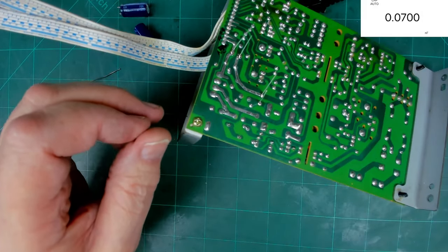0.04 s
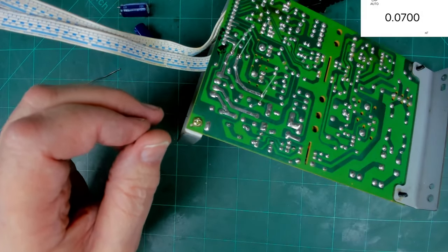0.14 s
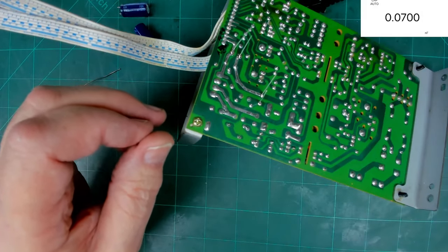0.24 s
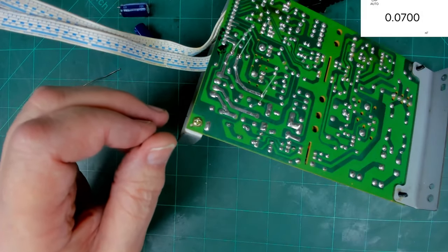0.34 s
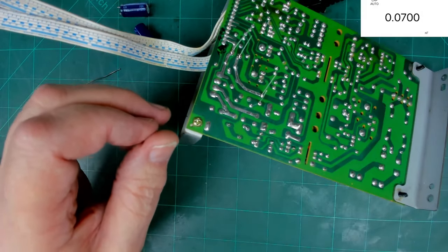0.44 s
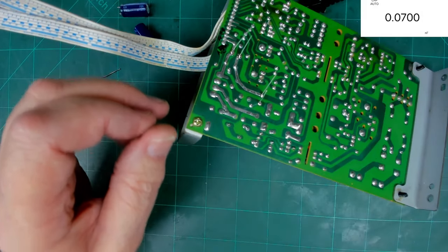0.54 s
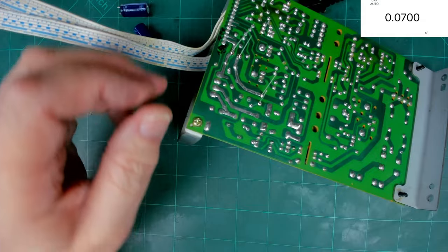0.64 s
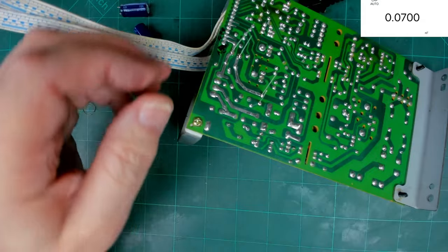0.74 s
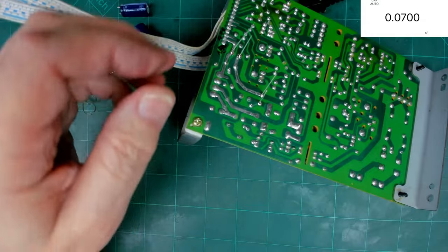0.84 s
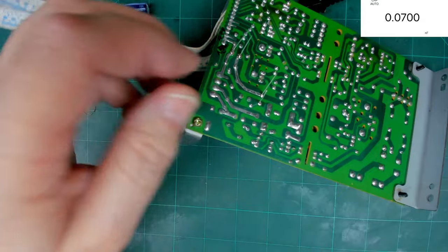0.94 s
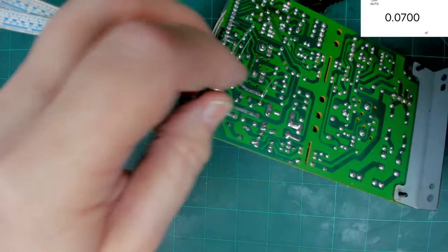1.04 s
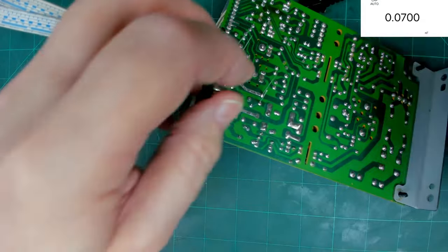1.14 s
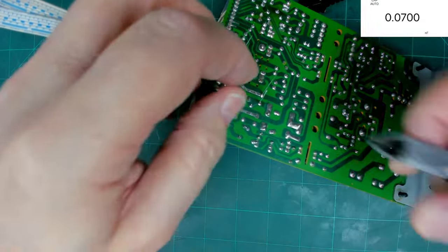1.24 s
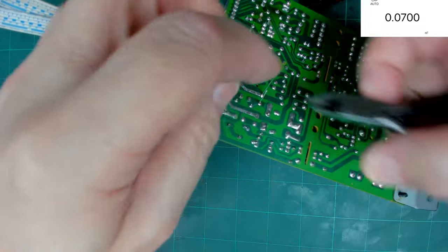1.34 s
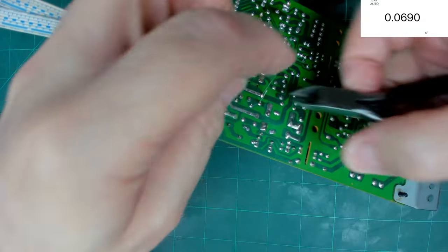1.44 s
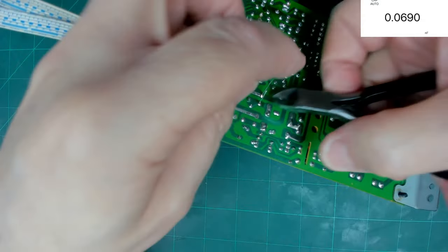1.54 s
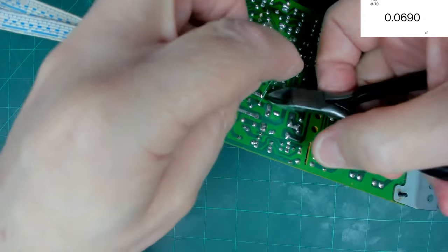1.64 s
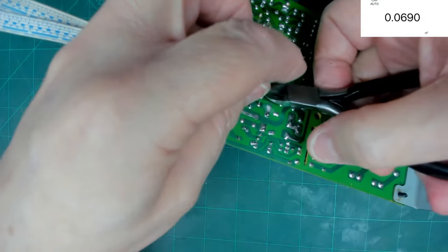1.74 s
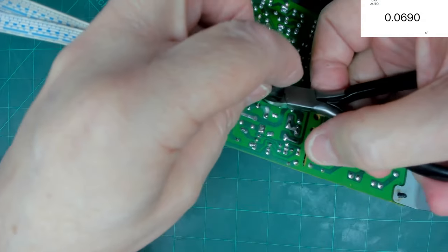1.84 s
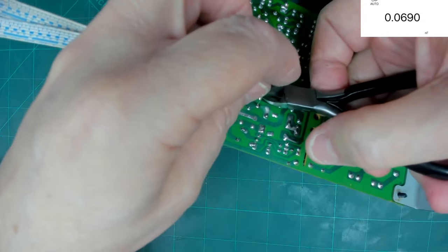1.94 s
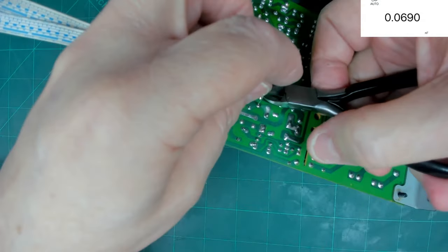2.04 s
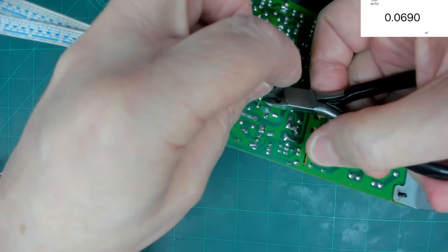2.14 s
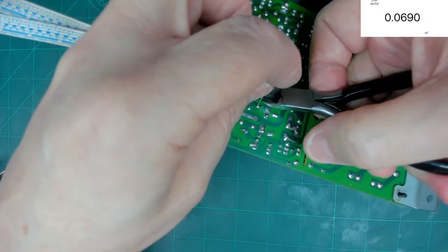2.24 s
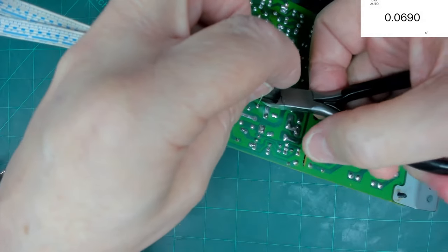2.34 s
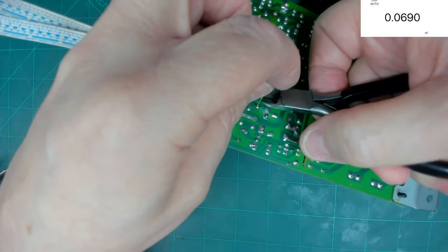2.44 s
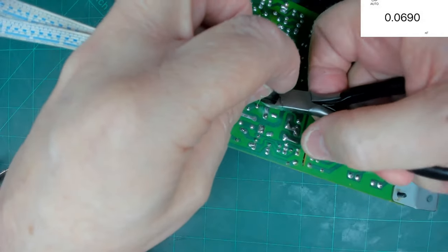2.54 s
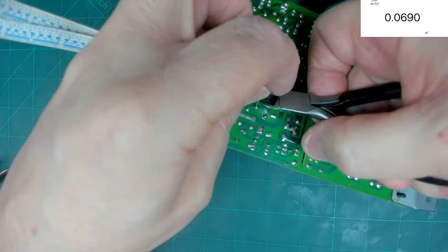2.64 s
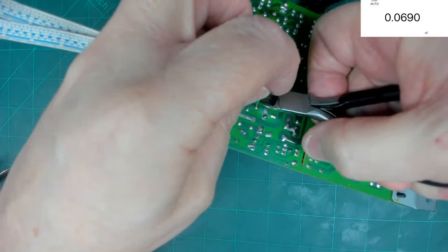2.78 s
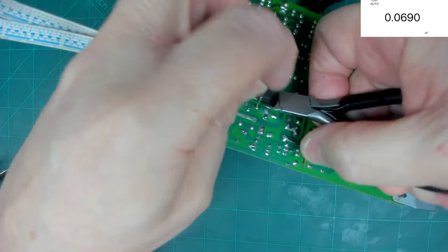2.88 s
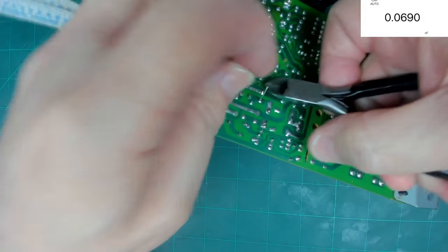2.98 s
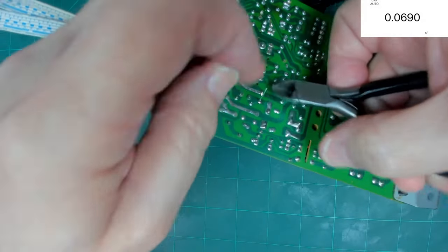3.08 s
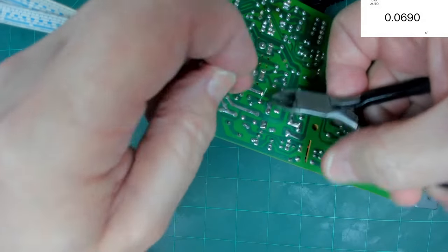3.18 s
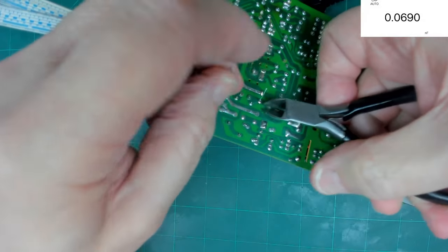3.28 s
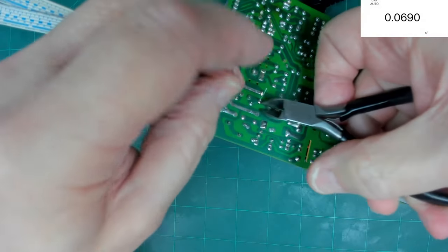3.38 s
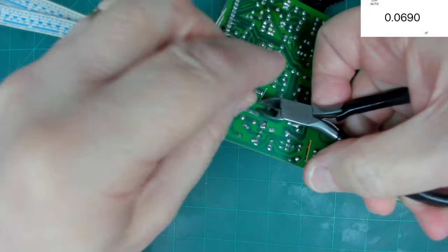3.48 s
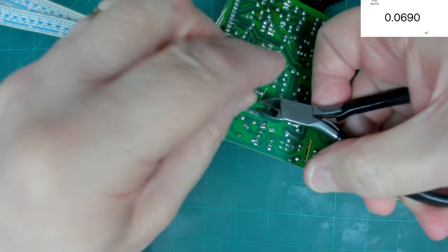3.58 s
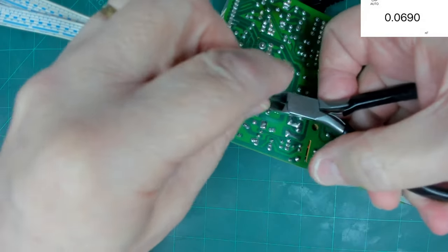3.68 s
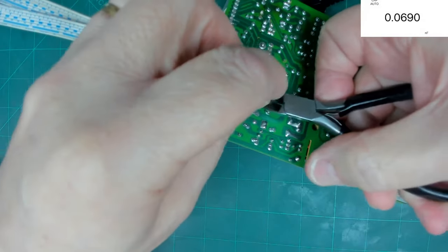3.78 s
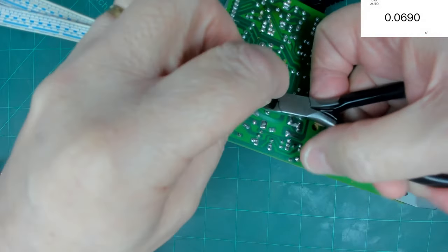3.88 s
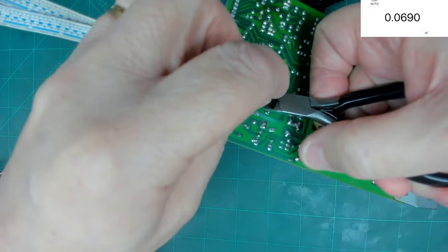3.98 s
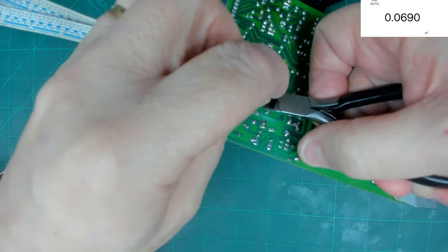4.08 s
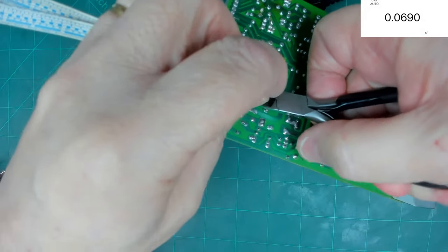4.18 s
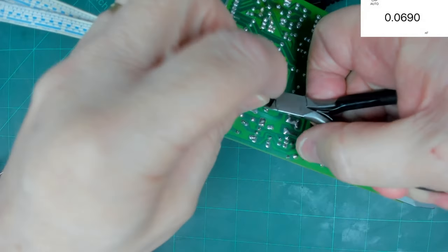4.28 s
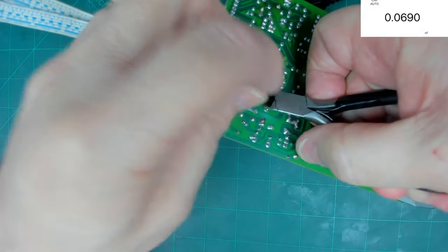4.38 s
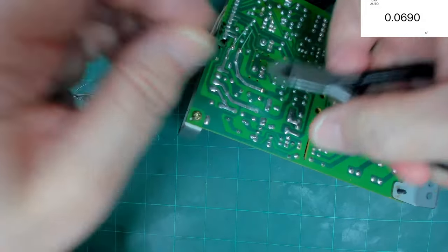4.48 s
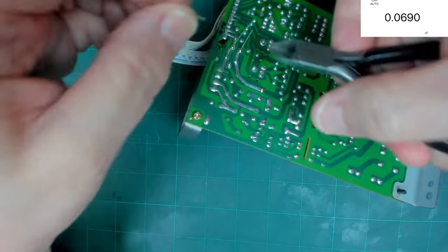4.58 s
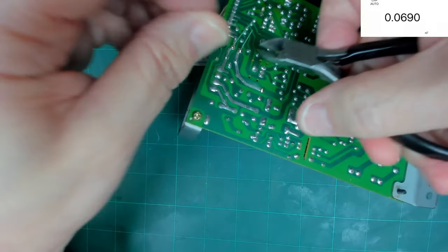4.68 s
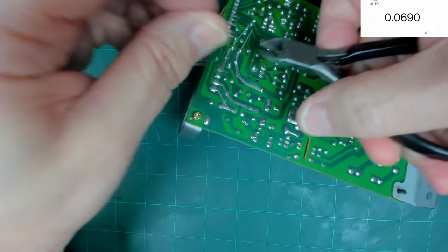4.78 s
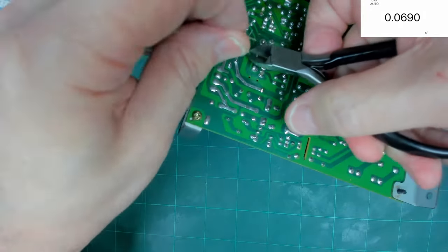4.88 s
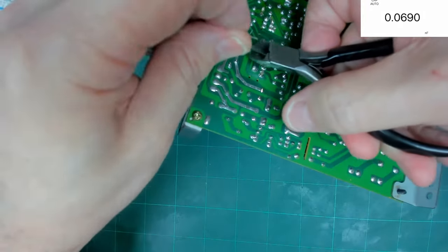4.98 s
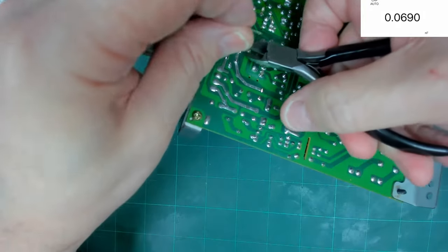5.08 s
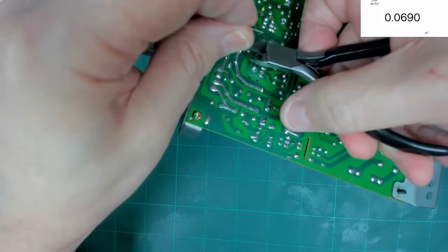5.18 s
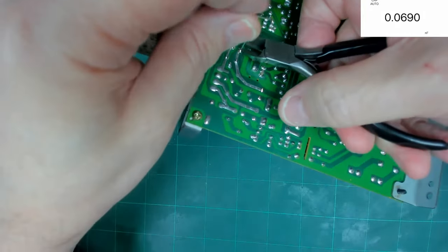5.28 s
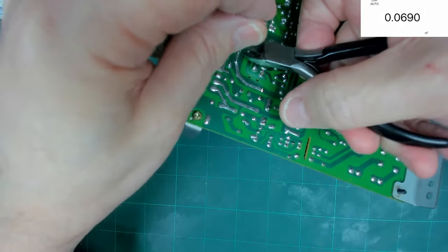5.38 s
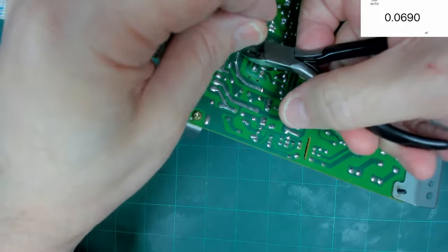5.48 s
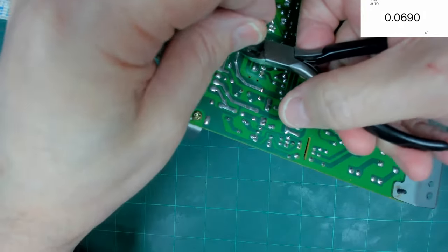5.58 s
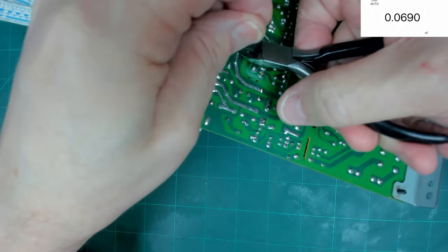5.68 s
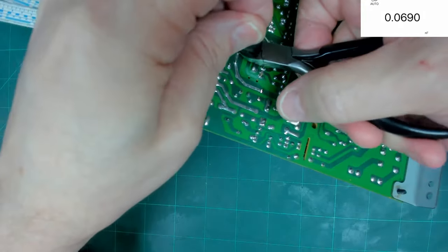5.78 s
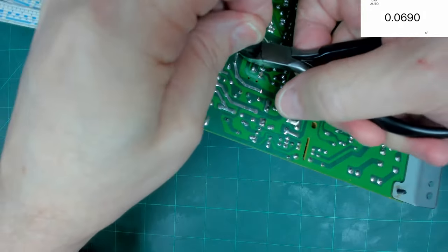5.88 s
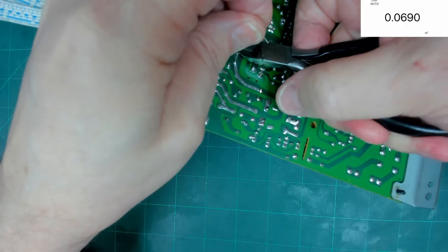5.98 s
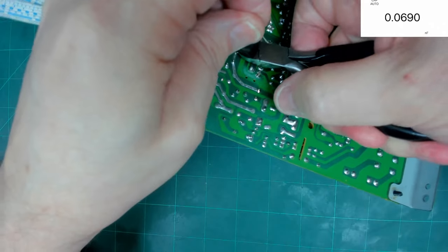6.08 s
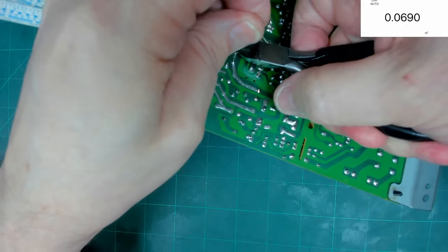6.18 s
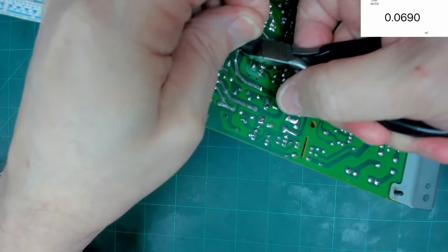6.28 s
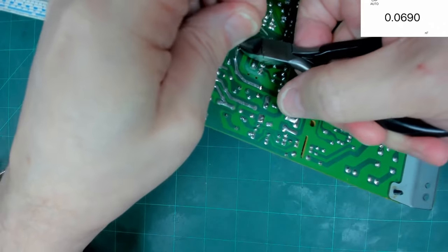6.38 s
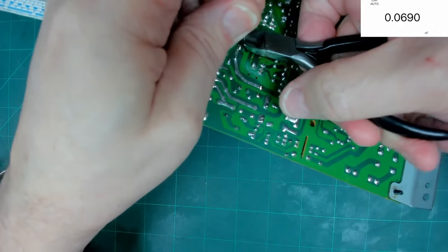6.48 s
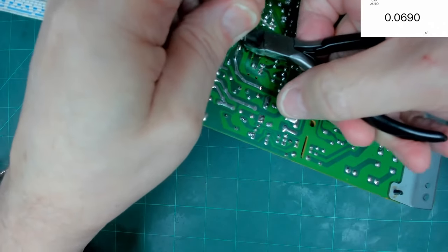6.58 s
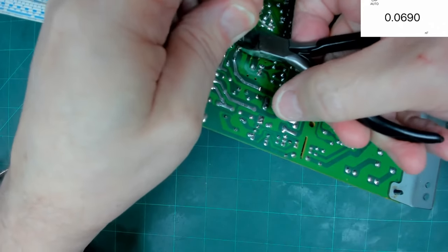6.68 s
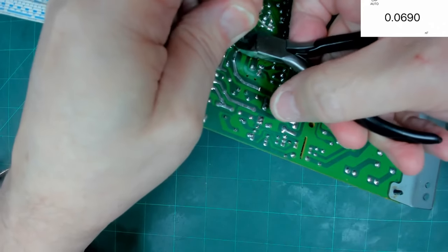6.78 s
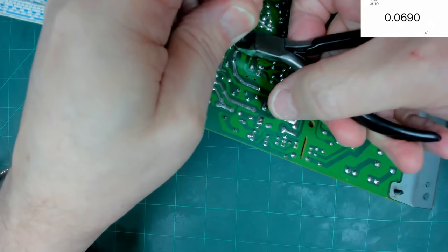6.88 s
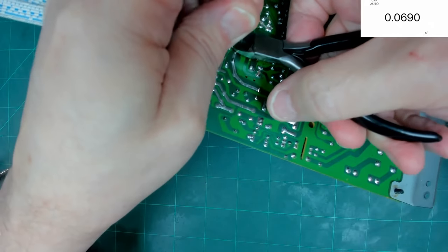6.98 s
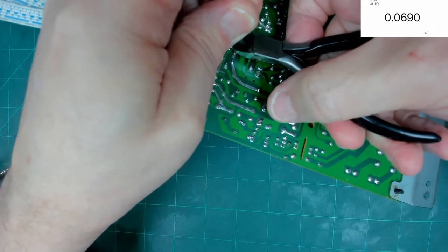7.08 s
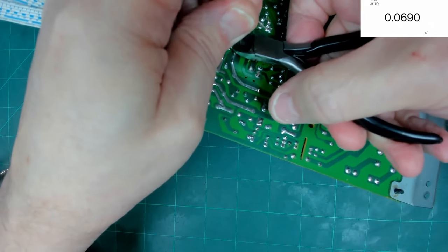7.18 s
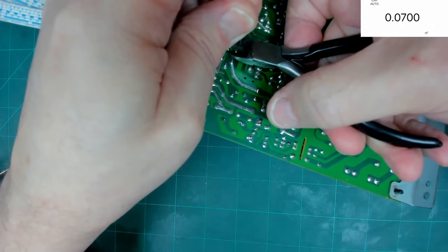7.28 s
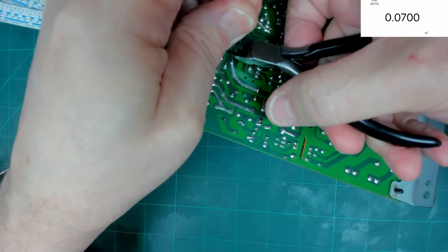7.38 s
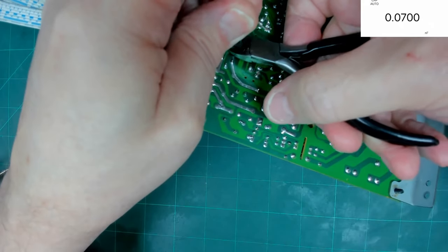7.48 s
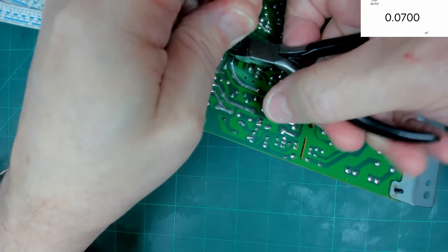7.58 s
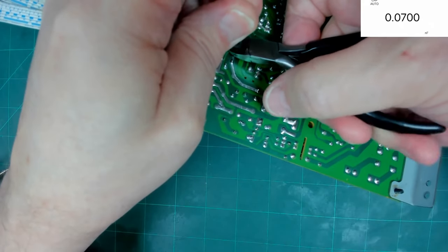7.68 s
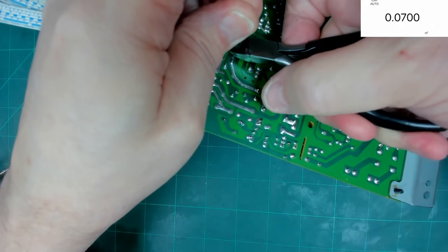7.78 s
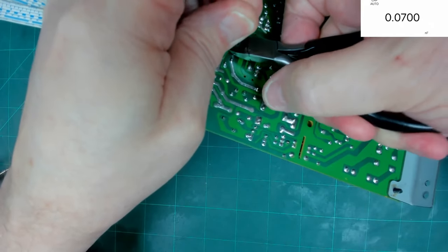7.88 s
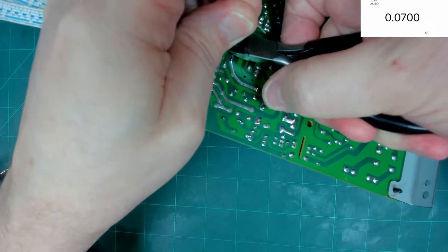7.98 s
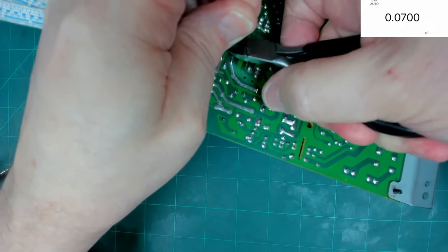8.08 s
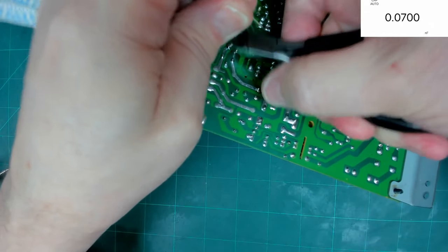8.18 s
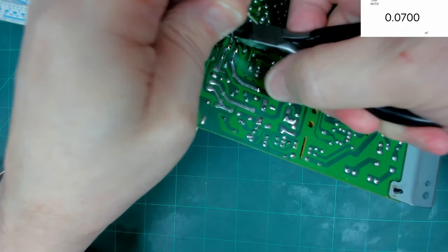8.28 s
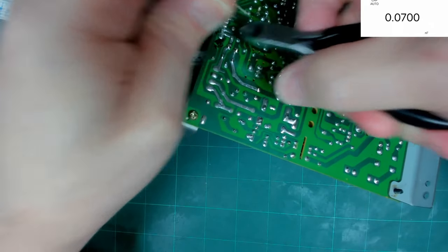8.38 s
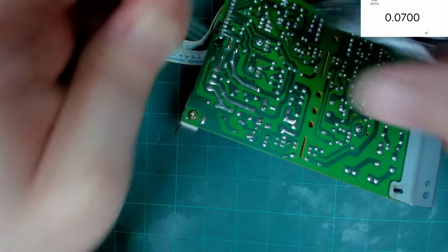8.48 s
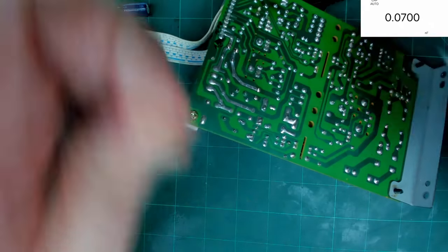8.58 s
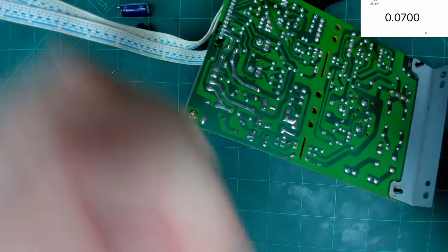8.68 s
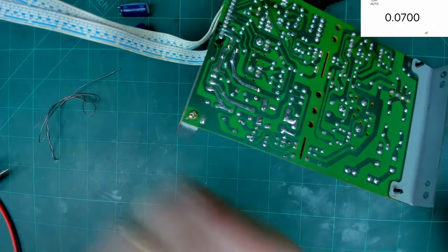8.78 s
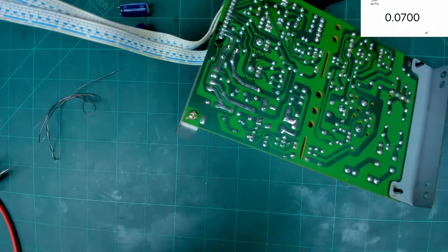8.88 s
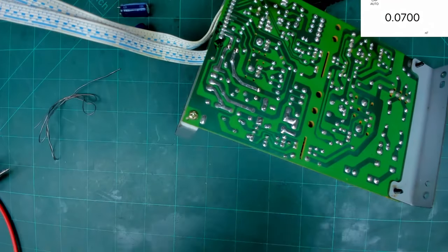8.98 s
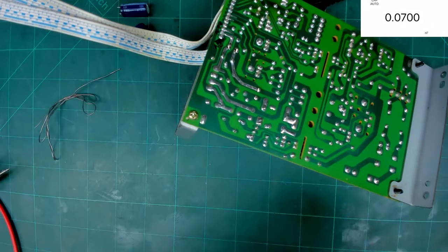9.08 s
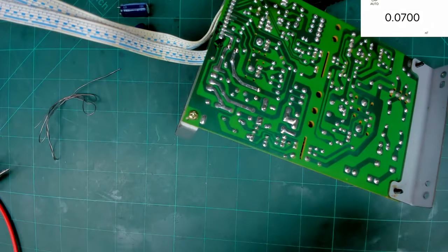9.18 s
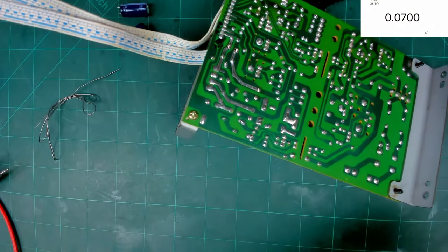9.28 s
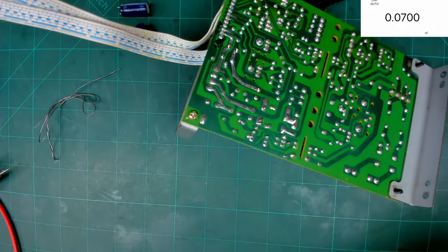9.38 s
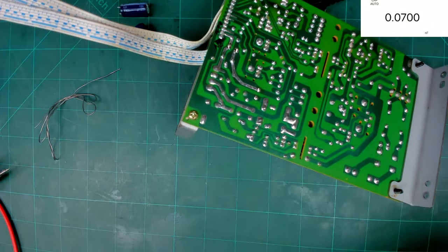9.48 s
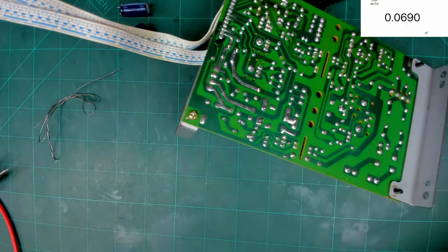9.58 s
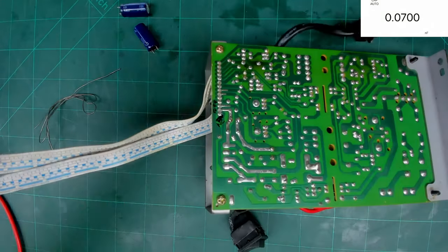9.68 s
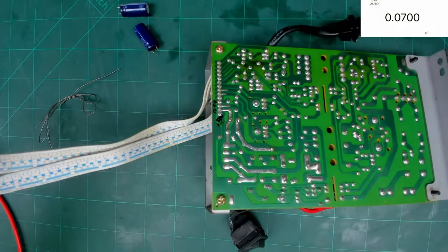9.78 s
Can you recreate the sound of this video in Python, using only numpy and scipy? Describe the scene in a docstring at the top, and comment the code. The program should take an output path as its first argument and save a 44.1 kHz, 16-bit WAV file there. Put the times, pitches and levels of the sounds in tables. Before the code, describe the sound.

A small workshop bench is heard close in mono, with a faint, low, slightly unsteady fan hum and soft air hiss throughout. At about 0.1 to 0.2 seconds a soldering iron clatters into its metal stand: a tight cluster of dull knocks, short ringing and bright scraping. The hum is left alone until very faint ticks at 1.8 and 2.3. Side cutters snip leads at about 2.7, 4.2, 6.1 and 8.1 seconds, each an abrupt crack with a low thump, a small high ping, briefly ringing jaws and a short room bloom. Tiny ticks fall between, near 3.9, 5.8, 7.7 and 8.7. From 9.0 light contacts lead to the cutters dropping hard on the bench at 9.2, the loudest knock, bouncing at once with a short rub. Around 9.65 the board slides on its mat with a low shuddering scuff, and one last faint tick follows.

```python
"""A small workshop bench in mono, close to the microphone, with an equipment fan humming underneath throughout.
First a soldering iron clatters into its stand: struck modes, dull knocks and bursts of scraping noise.
Faint ticks follow as side cutters find the leads on a circuit board; four leads part, each with a thump,
a crack, a short ping and ringing jaws. At the end the cutters drop on the bench, a knock with ringing modes,
and the board is slid round on its mat, heard as unsteady coloured noise."""
import sys
import numpy as np
from scipy import signal
from scipy.fft import rfft, irfft, next_fast_len
from scipy.io import wavfile
from scipy.ndimage import map_coordinates

SR = 44100
rng = np.random.default_rng(int(sys.argv[2]) if len(sys.argv) > 2 else 0)


def to_wav(sig):
    """Store sig (one row per channel, or 1-D mono) as 16-bit WAV at the path in sys.argv[1].

    Samples outside -1..1 are clipped; the rate is SR.
    """
    pcm = np.clip(np.atleast_2d(sig), -1, 1) * 32767
    pcm = np.round(pcm).astype(np.int16)
    wavfile.write(sys.argv[1], SR, pcm.T)  # frames by channels


N = 433944
RING = np.arange(SR // 2) / SR  # the half second after a blow (s)


def amp(db):
    """Decibels to gain."""
    return 10 ** (np.asarray(db) / 20)


def unit(x):
    """Scale to rms 1."""
    return x / np.sqrt(np.mean(x ** 2) + 1e-20)


def along(points, hz):
    """Read (Hz, value) points on a log frequency axis."""
    f, v = np.transpose(points)
    return np.interp(np.log(hz + 1), np.log(f + 1), v)


def wobble(rate):
    """A smooth random curve, rate knots a second."""
    knots = rng.standard_normal(int(N * rate / SR) + 4)
    return map_coordinates(knots, [np.arange(N) * rate / SR])


def filtered(x, response):
    """Multiply the spectrum of x by a response of frequency."""
    m = next_fast_len(len(x) + 8192)  # padded so that the end does not wrap onto the start
    hz = np.fft.rfftfreq(m, 1 / SR)
    return irfft(rfft(x, m) * response(hz), m)[:len(x)]


def noise(spectrum):
    """Steady noise of rms 1 with a given colour."""
    return unit(filtered(rng.standard_normal(N), lambda hz: amp(along(spectrum, hz))))


def resonant(modes, order):
    """The (Hz, dB) spectrum of (Hz, width, dB) resonances; a higher order gives steeper skirts."""
    hz = np.geomspace(10, SR / 2, 2000)
    power = 0
    for centre, width, db in modes:
        response = np.abs(hz * width / (centre * centre - hz * hz + 1j * hz * width))
        power = power + (amp(db) * response ** order) ** 2
    return np.column_stack([hz, 10 * np.log10(power)])


def impulse(spectrum, size=2048):
    """The shortest causal (minimum-phase) pulse with a given colour, peak 1."""
    cepstrum = irfft(np.log(amp(along(spectrum, np.fft.rfftfreq(size, 1 / SR)))))
    cepstrum[1:size // 2] *= 2  # fold the second half onto the first
    cepstrum[size // 2 + 1:] = 0
    pulse = irfft(np.exp(rfft(cepstrum)))
    return pulse / np.abs(pulse).max()


def tail(spectrum, length):
    """Diffuse ringing from about rms 1; each band dies in the room's time, times length."""
    # How the room dies away. Each row: frequency in Hz, t60 in s at length 1.
    room = [(100, 0.55), (400, 0.38), (1500, 0.26), (4000, 0.21), (6500, 0.2), (10000, 0.17), (16000, 0.14)]
    hz, t, bands = signal.stft(rng.standard_normal(len(RING)), SR, nperseg=256)
    t60 = length * along(room, hz)[:, None]
    fading = signal.istft(bands * amp(-60 * t / t60), SR, nperseg=256)[1]
    colour = impulse(spectrum)
    return signal.fftconvolve(fading, colour / np.linalg.norm(colour))[:len(RING)]


def add(track, s, sound):
    """Mix a sound into the track at s seconds."""
    part = track[max(round(s * SR), 0):][:len(sound)]
    part += sound[:len(part)]


def ringing(modes):
    """A struck body's modes decay as sines, at slightly new strengths for each blow."""
    hz, db, t60 = np.transpose(modes)[:, :, None]
    strength = amp(db + 2.1 * rng.standard_normal(hz.shape) - 60 * RING / t60)
    sign = (-1) ** np.arange(len(modes))[:, None]
    onset = 1 - np.exp(-RING / 0.0013)
    return np.sum(sign * strength * np.sin(2 * np.pi * hz * RING), axis=0) * onset


def contact(modes, knock_db, ring_db, clack_db, pitch=1):
    """A dull knock with its room echo, the ring of the struck body and the clack of the tool's metal."""
    # Colour of the dull knock. Each row: frequency in Hz at pitch 1, relative level in dB per Hz.
    knock_colour = [(30, -43), (120, -6.5), (300, -11.5), (550, 4), (800, 1), (1050, -5), (1400, -25.5),
                    (2500, -42.5), (5000, -31.5), (16000, -44)]
    # Colour of the metal clack. Each row: frequency in Hz, relative level in dB per Hz.
    clack_colour = [(200, 8), (800, 8), (1600, 7.5), (2600, -5), (3600, -3), (5000, -17), (8000, -24.5),
                    (12000, -28), (16000, -27)]
    colour = np.array(knock_colour) * [pitch, 1]
    sound = amp(knock_db - 19.5) * tail(colour, length=0.44)
    sound += amp(ring_db - 9) * ringing(modes)
    sharp_start = 1 + 2.47 * amp(-60 * RING / 0.017)
    sound += amp(clack_db - 0.5) * tail(clack_colour, length=0.86) * sharp_start
    soft = signal.butter(2, 4500, fs=SR, output="sos")  # the blow takes a moment to build
    add(sound, 0, amp(knock_db) * signal.sosfilt(soft, impulse(colour)))
    return sound


def fan():
    """Air drones in the housing's resonances, under slightly unsteady tones and a soft hiss."""
    # Resonances of the fan's housing. Each row: centre in Hz, width in Hz at order 1, relative level in dB.
    housing = [(37.6, 5, -1.5), (270, 16, -9), (318, 44, -4.5), (362.5, 12.7, 1.5), (747.6, 31, -14.5),
               (1387, 50, -24)]
    # Colour of the low rumble. Each row: frequency in Hz, relative level in dB per Hz.
    rumble = [(15, -9), (60, 0.5), (140, -4.5), (190, 3.5), (330, 3.5), (450, -0.5), (570, -3.5), (800, 0),
              (1000, -18.5), (1500, -39.5)]
    # Colour of the hiss of air. Each row: frequency in Hz, relative level in dB per Hz.
    air = [(530, -31.5), (900, -7), (979, -2), (1040, -4), (1230, -6.5), (1420, -0.5), (1540, -2),
           (1940, -2), (2430, -5.5), (2620, -9.5), (3890, -12.5), (4600, -21), (15800, -35)]
    # Fan and mains tones. Each row: frequency in Hz, typical level in dB rms.
    tone_rows = [(120, -80), (361, -72.5), (686.6, -73), (1961.4, -88), (2353.7, -91.5), (2746, -94.5)]
    # Slow course of the drone, followed in part. Each row: time in seconds, relative level in dB.
    drone_level = [(0.4, -58), (1.32, -64.5), (2.67, -60), (3.76, -66), (4.26, -62), (5.11, -64.5),
                   (5.77, -60.5), (8.54, -61.5), (8.9, -62.5)]
    mean_gain_db, swing_share = -.5, 0.57  # the share of the course's swing that the drone follows

    t = np.arange(N) / SR
    drone = amp(-59.5) * noise(resonant(housing, order=2)) + amp(-66.0) * noise(rumble)
    level_db = np.interp(t, *np.transpose(drone_level))
    drone *= amp(mean_gain_db + swing_share * (level_db - level_db.mean()))
    tones = np.zeros(N)
    for hz, db in tone_rows:
        level = amp(db + 0.82 * wobble(3.0)) * np.sqrt(2)  # rms to peak
        tones += level * np.sin(2 * np.pi * hz * t + 0.98 * wobble(3.4))
    hiss = amp(-75.5 + 0.25 * wobble(2.7)) * noise(air)
    return drone + tones + hiss


def iron():
    """The iron bounces into its stand: square blows ring the stand, glancing ones scrape metal on metal."""
    # The iron's blows. Each row: start in seconds, strength in dB, slant from 0 (square) to 1 (glancing).
    clatter = [(.094, -51, 0.13), (0.1377, -23.5, 0.53), (0.1426, -25.5, 0.014), (.1547, -26, 0.64),
               (.162, -25, 0.83), (.172, -32.5, 0.62), (0.1858, -29.5, 0.95), (0.2054, -43.5, 1),
               (.283, -53.5, 0.99)]
    # Modes of the stand. Each row: frequency in Hz, relative level in dB, t60 in s.
    stand = [(148.7, -6, 0.23), (256.7, -12, 0.24), (361, -5, 0.17), (415, -14, 0.21), (506, -2.5, 0.092),
             (599, -1, 0.14), (738, -4.5, 0.17), (830, -25, 0.17), (904, 2.5, 0.16), (1070, -2, 0.12),
             (1138, -2.5, 0.17), (1413, -11.5, 0.2), (1860, -10.5, 0.16), (3500, -21, 0.15)]
    # Colour of the scrape. Each row: frequency in Hz, relative level in dB per Hz.
    scrape = [(1000, -16), (4000, 12), (6000, 2), (9000, 1.5), (11000, -4), (14000, 1.5), (16000, -12)]
    out = np.zeros(N)
    for s, db, slant in clatter:
        # dB settings relative to the strength: a square blow's part, then what a full glance changes
        ring_db = db + 6.5 + slant * -15.5
        clack_db = db - 16 + slant * 5
        scrape_db = db - 37 + slant * 23
        # the light stand knocks higher than the bench
        add(out, s, contact(stand, db, ring_db, clack_db, pitch=1.11))
        add(out, s, amp(scrape_db) * tail(scrape, length=0.77))
    return out


def ticks():
    """Jaws and fingers touch the leads: each faint tick is followed by a softer one as the jaw skids."""
    # Touches on the leads. Each row: start in seconds, relative level in dB.
    touches = [(1.8366, -74.5), (2.276, -69), (3.901, -65), (5.7577, -68.5), (7.651, -73), (8.7198, -70.5),
               (9.7513, -76)]
    # Colour of a tick. Each row: frequency in Hz, relative level in dB per Hz.
    tick = [(300, 6), (1500, -1), (2300, 0.5), (3400, -5), (4500, -19), (6000, -18), (9000, -32),
            (16000, -31)]
    slip_s, slip_db = 0.031, -7.5  # typical delay until the jaw catches again, its level against the first
    out = np.zeros(N)
    for s, db in touches:
        slip = slip_s * rng.uniform(.7, 1.3)
        for delay, level_db in [(0, db), (slip, db + slip_db)]:
            sharp_start = 1 + 2.6 * amp(-60 * RING / 0.024)
            add(out, s + delay, amp(level_db) * tail(tick, length=.8) * sharp_start)
    return out


def thump(width, rise, recoil, settle_hz):
    """The thump of a snip: a short dip, then a push that the microphone's low limit swings back to zero."""
    dip = np.sin(np.pi * np.minimum(RING / width, 1) ** 0.83)
    push = np.clip((RING - width) / rise, 0, 1) * amp(-60 * RING / 0.11)
    low_limit = signal.butter(3, settle_hz, "high", fs=SR, output="sos")
    return signal.sosfilt(low_limit, recoil * push - dip)


def snips():
    """Each lead parts with a thump and a bright crack; the room blooms and the steel jaws ring on."""
    # Leads parting. Each row: start in seconds, then relative levels in dB of thump, jaw ring and fracture,
    # then the ping of the cut lead in Hz and its relative level in dB.
    cuts = [(2.7403, -20, -41.5, -46.5, 2146, -43.5), (4.2023, -19.5, -38, -41, 2280, -43),
            (6.0872, -22, -43, -45, 3270, -55), (8.0545, -23, -41.5, -52.5, 2380, -47)]
    # Broad resonances of the steel jaws. Each row: centre in Hz, width in Hz, relative level in dB.
    jaws = [(346, 214, 0.5), (1410, 85, -9), (1970, 79, -7), (2185, 110, -1.5), (2390, 120, -0.5),
            (2940, 110, 1.5), (3180, 95, -11), (3400, 140, 2.5), (3850, 114, 5.5), (4200, 170, -7.5),
            (4860, 320, -20), (6370, 120, 2.5), (6700, 170, -2)]
    # Clear partials of the jaws. Each row: frequency in Hz, relative level in dB, t60 in s.
    steel = [(1880, -21, 0.27), (2216, -3.5, 0.061), (2800, -12, 0.13), (3660, -12.5, 0.14),
             (3780, -13, 0.13), (4370, -28, 0.08), (6400, -13, 0.072), (6900, -25, 0.28)]
    # Colour of the room's bloom. Each row: frequency in Hz, relative level in dB per Hz.
    bloom = [(100, -5), (330, 1), (550, -8), (850, -8.5), (1200, -14), (2000, -8), (4000, -24), (8000, -59)]
    # Colour of the crack. Each row: frequency in Hz, relative level in dB per Hz.
    fracture = [(500, 0), (3000, -1), (5400, 2), (8300, -5.5), (10000, 3.5), (13000, 1), (14800, 2.5),
                (16000, 3.5)]
    out = np.zeros(N)
    for s, thump_db, jaws_db, fracture_db, ping_hz, ping_db in cuts:
        add(out, s, amp(thump_db) * thump(width=.0014, rise=0.00088, recoil=0.81, settle_hz=15))
        add(out, s, amp(thump_db - 32) * tail(bloom, length=2.26))
        add(out, s, amp(jaws_db) * tail(resonant(jaws, order=1), length=0.95))
        add(out, s, amp(jaws_db - 9) * ringing(steel))
        add(out, s, ringing([(ping_hz, ping_db, .1)]))  # each lead has its own length and note
        sharp_start = 1 + 0.23 * amp(-60 * RING / .025)
        add(out, s, amp(fracture_db) * tail(fracture, length=1.06) * sharp_start)
    return out


def knocks():
    """Cutters drop and bounce, then the board is nudged; ring and clack follow each contact's force."""
    # Cutters and board meeting the bench. Each row: start in seconds, strength in dB,
    # the rocking that follows in dB relative to it, extra metal clack in dB.
    landings = [(9.029, -36, 0, 0.5), (9.146, -26.5, -11.5, 5.5), (9.204, -2, -8, 1),
                (9.2466, -13, -6, -1.5), (9.3041, -47, -14, 6), (9.6506, -53.5, -20, 1)]
    # Modes of the bench top, and the long 308 Hz ring of the board's metal bracket. Each row: frequency in Hz,
    # relative level in dB, t60 in s.
    bench = [(128, -8, 0.2), (234, -14, 0.21), (308, -23, 1.4), (371, -4, 0.31), (435, -11.5, 0.21),
             (473, 7, 0.12), (517, -5, 0.12), (585.6, 2, 0.16), (606, -25, 0.174), (855, -6, 0.13),
             (870, -22, .2), (1032, -6.5, 0.13), (1120, -10, 0.18), (1244, -10, 0.16), (1430, -30, 0.052),
             (1560, -12, 0.12), (1710, -44, 0.26), (1946, -22, 0.16)]
    # Delays in seconds at which a landing object rocks onto two more points.
    rock_s = [.0052, .0094]
    medium_db, medium_ring_db, medium_clack_db = -19.5, -27, -43.5  # a medium knock, its ring and its clack
    ring_growth, clack_growth = 0.63, 0.8  # dB of ring and of clack per dB of knock
    out = np.zeros(N)
    for s, db, rocking_db, metal_db in landings:
        first = [(0.00018, db)]
        rocking = [(later, db + rocking_db) for later in rock_s]
        for delay, knock_db in first + rocking:
            force_db = knock_db - medium_db
            ring_db = medium_ring_db + ring_growth * force_db
            clack_db = medium_clack_db + clack_growth * force_db + metal_db
            add(out, s + delay, contact(bench, knock_db, ring_db, clack_db))
    return out


def stroke(start, hold, release_db_per_s):
    """Gain of one push: a short attack, a hold and a steady fade."""
    attack_s = 0.018
    t = np.arange(N) / SR - start
    fade = amp(-release_db_per_s * np.maximum(t - attack_s - hold, 0))
    return np.clip(t / attack_s, 0, 1) * fade


def slides():
    """The board sticks and slips on the mat: rubbing and low shuddering noise under an unsteady grip."""
    # Pushes of the board. Each row: start in seconds, hold in seconds,
    # rub and shudder levels in dB before the grip varies them, release in dB per s.
    pushes = [(9.215, 0.018, -47.5, -65, 47), (9.643, .16, -54, -47.5, 60)]
    # Colour of the rub. Each row: frequency in Hz, relative level in dB per Hz.
    rub_colour = [(100, -28), (250, -1.5), (370, 8), (500, -13.5), (700, -7.5), (1100, -18.5), (2200, -20),
                  (4000, -34), (7000, -43.5), (16000, -52)]
    # Colour of the shudder. Each row: frequency in Hz, relative level in dB per Hz.
    shudder_colour = [(15, 1), (40, 1.5), (70, -1.5), (110, -1), (160, -20), (300, -13.5), (800, -78)]
    grip = amp(1.5 * wobble(45))
    rub, shudder = noise(rub_colour), noise(shudder_colour)
    out = np.zeros(N)
    for s, hold, rub_db, shudder_db, release in pushes:
        out += stroke(s, hold, release) * (amp(rub_db) * rub + amp(shudder_db) * shudder)
    return grip * out


def scene():
    """Everything at the bench, heard in mono."""
    return (fan() + iron() + ticks() + snips() + knocks() + slides())[None]


def record(dry):
    """The recorder keeps nothing above its band limit."""
    top_hz, edge_hz = 15720, 300  # middle and width of the sloping edge
    return np.array([filtered(x, lambda hz: np.clip((top_hz - hz) / edge_hz + .5, 0, 1)) for x in dry])


dry = scene()
out = record(dry)
to_wav(out)
```